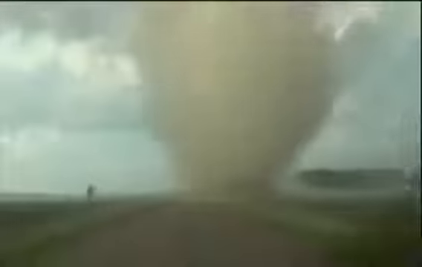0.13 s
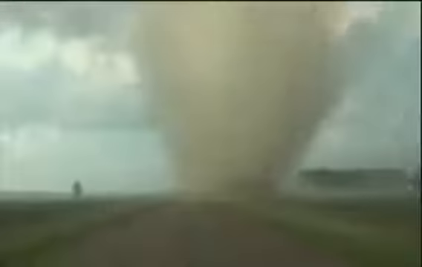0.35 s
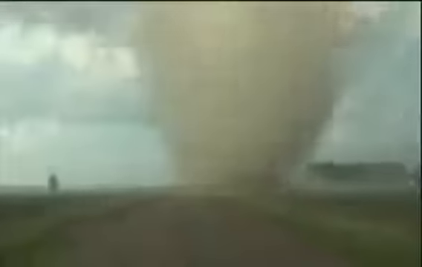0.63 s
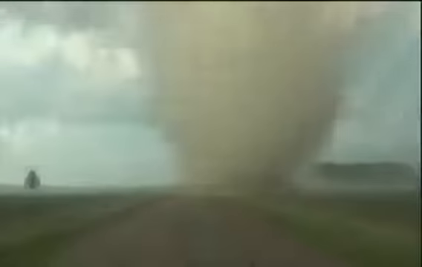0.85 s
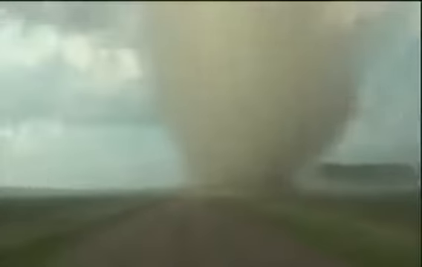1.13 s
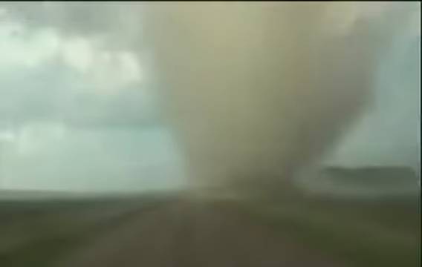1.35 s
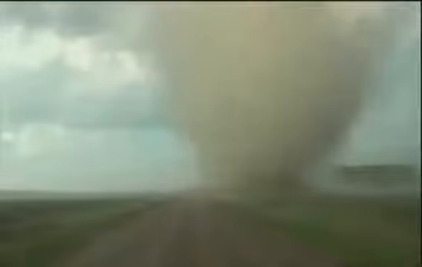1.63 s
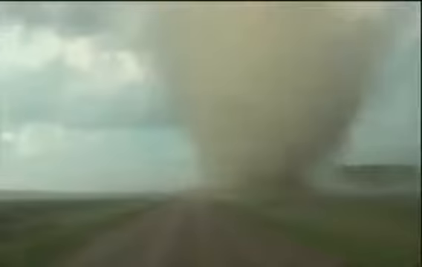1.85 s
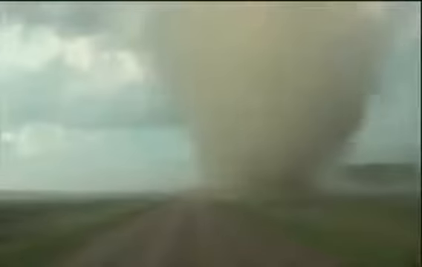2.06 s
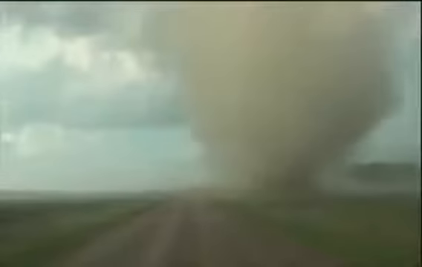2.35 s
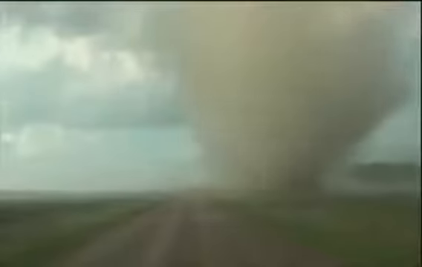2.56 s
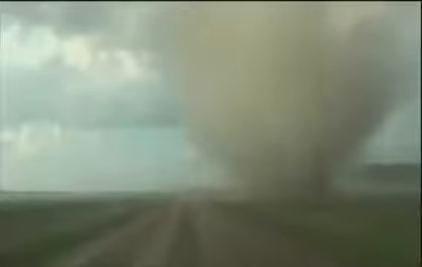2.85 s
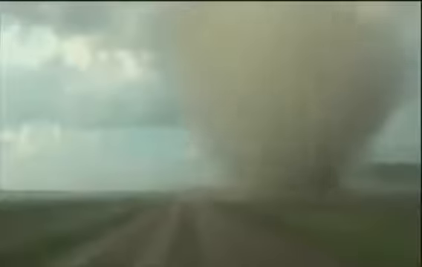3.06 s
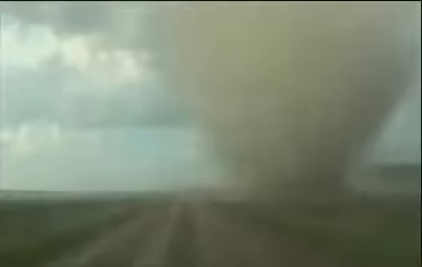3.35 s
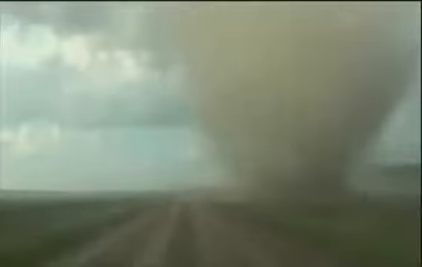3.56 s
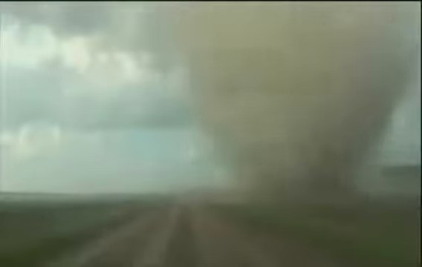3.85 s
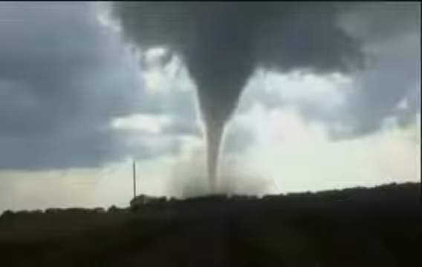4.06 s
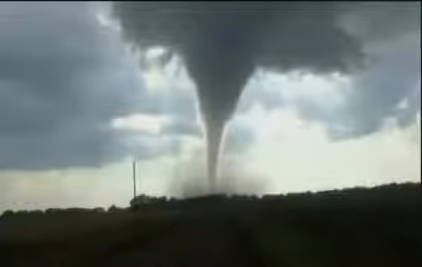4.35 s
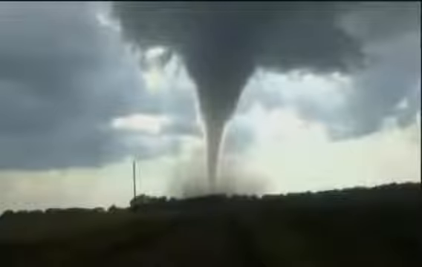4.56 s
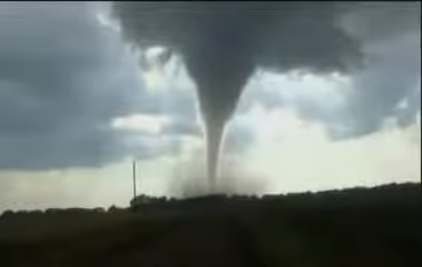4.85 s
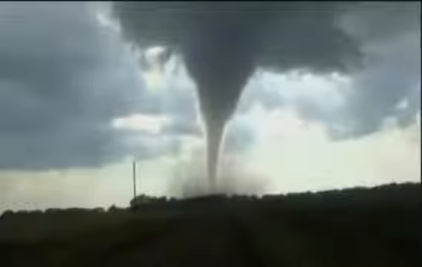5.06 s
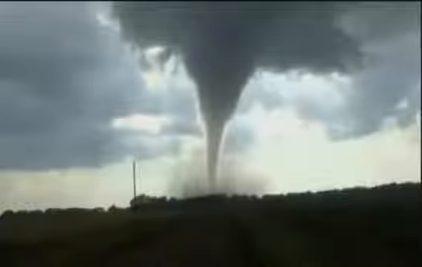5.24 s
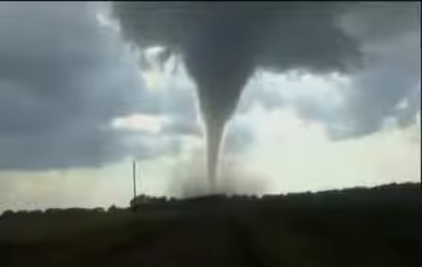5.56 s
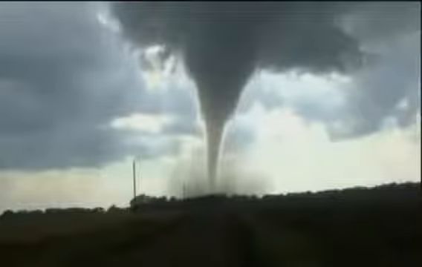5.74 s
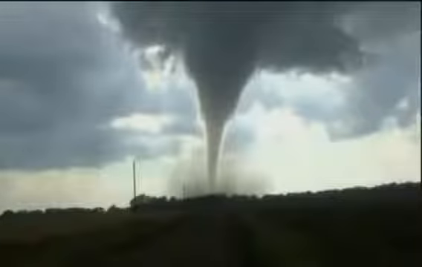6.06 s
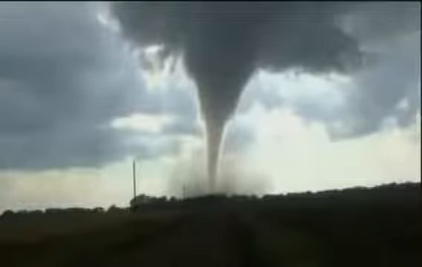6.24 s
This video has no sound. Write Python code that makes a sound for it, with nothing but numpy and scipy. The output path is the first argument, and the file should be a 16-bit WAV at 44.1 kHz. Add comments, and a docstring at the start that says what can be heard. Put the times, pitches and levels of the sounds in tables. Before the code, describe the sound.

A car sits in a tornado's inflow: heavy low wind buffets the close microphone, air rushes over the body and sand hisses. Stones crack hard on metal panels, at first singly, then in a dense cluster from about two seconds, with sprays of dirt. At four seconds it switches abruptly to a far quieter distant storm, a hollow roar over steady hiss with faint high twittering.

```python
"""Car in a tornado's inflow

Gusts buffet the microphone and air rushes over the body: shaped noise whose level follows the wind. Grit hisses
as dense grains; stones crack as decaying crackle and set resonant modes of the car ringing. Clumps of dirt
spray as swelling crackle, and the hardest cracks make the recorder turn its gain down. After four seconds the
storm gives way to a distant funnel: a hollow roar, a soft rumble and a steady hiss, all noise, with a faint
twitter of falling tones. Sines that swell and fade make the body boom throughout."""
import sys
import numpy as np
from scipy import signal
from scipy.fft import rfft, irfft
from scipy.io import wavfile
from scipy.ndimage import uniform_filter1d, minimum_filter1d

SR = 44100
rng = np.random.default_rng(int(sys.argv[2]) if len(sys.argv) > 2 else 0)


def digitize_waveform(pressure):
    """Quantize a signal to 16-bit integers and store it at the path in sys.argv[1].

    Rows of a 2-D input are taken as channels; values are limited to [-1, 1].
    """
    field = np.atleast_2d(pressure).T
    bounded = np.clip(field, -1, 1)
    quanta = np.round(bounded * 32767).astype(np.int16)
    wavfile.write(sys.argv[1], SR, quanta)


N = 282240
TIME = np.arange(N) / SR   # s
BINS_HZ = np.arange(N // 2 + 1) * SR / N
CHANGE_S, CROSSFADE_S = 4.013, 0.044   # middle and length of the passage from near to distant storm
CUTOFF_HZ = 10900   # top of the recorded band

# Strength of the near wind: start_s, buffeting_db (before gusts), rush_db (before lift and flurries)
NEAR_WIND = [(0.0, -16.5, -28), (0.1, -17.5, -28.5), (0.25, -18, -30), (0.7, -18.5, -29.5),
             (0.83, -19.5, -30), (1.02, -16, -26), (1.4, -21.5, -28), (1.6, -21.5, -28), (1.72, -17, -28.5),
             (1.9, -20.5, -30.5), (2.15, -22, -28), (2.33, -21, -30), (2.8, -21.5, -30.5), (3.05, -20, -29),
             (3.33, -22.5, -30.5), (3.6, -18, -29), (3.82, -22.5, -33.5), (4.0, -18, -28)]
# Strength of the wind-borne sand: start_s, level_db (before lift and flurries)
SAND_STRENGTH = [(0.0, -43.5), (0.1, -46), (0.3, -41.5), (0.5, -36.5), (0.85, -41), (0.97, -37),
                 (1.25, -38.5), (1.42, -43.5), (1.7, -42.5), (2.0, -37.5), (2.17, -37.5), (2.28, -37.5),
                 (2.48, -32), (2.64, -39), (3.0, -41), (3.22, -37.5), (3.45, -41), (3.8, -42.5),
                 (4.0, -37.5)]
# Spectrum of the buffeting: frequency_hz, density_db (per Hz, relative)
BUFFET_SPECTRUM = [(12, -7.5), (28, 2.5), (45, 0.5), (60, 5.5), (82, -5), (118, -2.5), (165, -7.5),
                   (230, -11.5), (340, -16), (600, -29.5), (1500, -88)]
# Spectrum of the air rushing over the body: frequency_hz, density_db (per Hz, relative)
RUSH_SPECTRUM = [(100, -14), (175, 5.5), (260, -2), (350, 1), (550, -3), (800, -7.5), (1150, -14.5),
                 (2000, -22), (5000, -57)]


def near_storm():
    """Turbulent pressure fluctuation: gusts lift the buffeting, rushing air and grit share quick flurries."""
    buffet_db, rush_db = in_time(NEAR_WIND)
    sand_db, = in_time(SAND_STRENGTH)
    flurry = drift(19)
    buffet = from_db(buffet_db + gusts()) * shedding(eddies(BUFFET_SPECTRUM, span_s=0.035))
    rush = from_db(rush_db + 0.5 + 1.8 * flurry) * eddies(RUSH_SPECTRUM, span_s=0.024)
    sand = from_db(sand_db + 0.98 + 0.5 * flurry)
    hissing_grit = stereo(grit(sand), grit(sand), side_db=-11.5)
    impacts = stereo(debris(), debris(), side_db=-11.0)
    return buffet + rush + hissing_grit + impacts


# Pitch of the eddies on the microphone: start_s, pitch_hz (only its ratio to the first row acts)
EDDY_PITCH_CURVE = [(0.0, 58.42), (0.7, 62.4), (1.3, 53.99), (2.0, 44.11), (3.0, 43.69), (3.6, 52.5),
                    (4.0, 47.13)]


def shedding(x):
    """Frequency scaling: eddies come faster or slower with the wind and carry the whole spectrum along."""
    pitch_hz, = in_time(EDDY_PITCH_CURVE)
    position = np.cumsum(pitch_hz / pitch_hz[0])
    return np.interp(position, np.arange(N), x, period=N)


# Single gusts on the microphone: centre_s, lift_db (negative lowers the wind)
SINGLE_GUSTS = [(1.39, 5.5), (1.51, 6), (1.88, 5.5), (2.06, 3), (2.99, 2.5), (3.69, 1), (3.93, -1),
                (5.69, 2), (5.972, 11), (6.15, 5), (6.241, 11)]


def gusts(half_s=0.036):
    """Amplitude modulation: each gust briefly raises or lowers the low wind, as a bell curve in dB."""
    return sum(db * np.exp(-0.5 * ((TIME - s) / half_s) ** 2) for s, db in SINGLE_GUSTS)


# Stones on the panels: start_s, level_db, ring_s (60 dB decay), dull_hz (treble falls above), thud_hz,
# thud_db (against the crack)
STONE_HITS = [(0.1185, -4, 0.12, 3080, 715, -15.5), (0.1296, -2, 0.015, 3480, 1300, -12),
              (0.144, -18, 0.04, 4000, 1400, -10), (0.269, -25.5, 0.042, 2500, 480, 5),
              (1.4409, -1, 0.043, 3320, 714, -14.5), (1.566, -26.5, 0.19, 6000, 500, -23),
              (1.611, -33.5, 0.15, 5000, 500, -7), (2.108, -11.5, 0.018, 12000, 600, 4),
              (2.11, -0.5, 0.11, 6840, 1580, -11), (2.118, -10.5, 0.072, 5500, 437, 5.5),
              (2.164, -19, 0.26, 8100, 524, -5.5), (2.218, -26, 0.007, 3000, 1600, 7),
              (2.261, -12.5, 0.035, 6100, 1500, -12), (2.361, -23.5, 0.12, 7000, 500, -21),
              (2.559, -14, 0.034, 8000, 500, -13), (2.6, -17, 0.018, 6500, 500, -17),
              (2.6153, -17, 0.059, 8050, 500, -29), (2.669, -20.5, 0.075, 6040, 520, 0),
              (2.797, -16, 0.057, 5760, 500, -25), (3.301, -14, 0.057, 12000, 510, -2.5),
              (3.396, -14.5, 0.01, 12000, 500, -22), (3.74, -12.5, 0.056, 11000, 496, -15)]
# Clumps of dirt: peak_s, level_db, half_s (half length), dull_hz (treble falls above), thud_hz,
# thud_db (against the spray)
DIRT_CLUMPS = [(0.277, -25, 0.013, 2360, 484, -2), (0.736, -37.5, 0.051, 6000, 368, 8),
               (0.952, -29, 0.0063, 8000, 500, -8), (1.041, -28.5, 0.012, 6000, 620, 4.5),
               (1.836, -29, 0.02, 6760, 436, 1.5), (2.021, -24.5, 0.012, 8000, 513, -4),
               (2.076, -25.5, 0.0087, 8000, 500, -3), (2.324, -25, 0.0068, 9000, 503, -25),
               (2.401, -22.5, 0.0098, 9150, 505, -11), (2.53, -23, 0.017, 7500, 478, -5),
               (2.68, -20, 0.014, 7700, 930, -4.5), (3.221, -29, 0.0051, 9000, 500, -22),
               (3.263, -28, 0.021, 10100, 460, 0), (3.298, -32, 0.016, 7000, 490, 8),
               (3.462, -32.5, 0.0067, 12400, 497, -4), (3.702, -19, 0.015, 5400, 666, -5),
               (3.921, -27.5, 0.015, 7460, 500, -19), (3.979, -24, 0.012, 9700, 925, 2),
               (4.001, -36, 0.0076, 2500, 940, 8)]


def debris(snap=0.91, snap_s=0.00064, bite_s=0.00025, crumble=1.184, lumpy_db=1.4):
    """Impact excitation: stones snap, crumble and leave the body ringing; dirt swells and scatters in lumps."""
    crackle = soften(grains(per_s=22000, spread_db=4.0), 1700, "high", order=2)
    lumps_db = lumpy_db * drift(73)
    age = np.arange(int(SR / 4)) / SR
    middle = age[-1] / 2
    out, hard = np.zeros((2, N))
    for s, db, ring_s, *tone in STONE_HITS:
        uneven = from_db(lumps_db[int(s * SR):][:len(age)])
        fall = from_db(-60 * np.minimum(age / ring_s, 2) ** crumble)
        build_up = 1 - np.exp(-age / bite_s)
        envelope = from_db(db) * build_up * (fall * uneven + snap * np.exp(-age / snap_s))
        crack = contact(envelope, crackle, *tone)
        add(out, s, crack)
        add(hard, s, from_db(db) * crack)   # level counts twice: only hard blows ring the panels much
    for s, db, half_s, *tone in DIRT_CLUMPS:
        swell = np.exp(-0.5 * ((age - middle) / half_s) ** 2)
        envelope = from_db(db + lumps_db[int(s * SR):][:len(age)]) * swell
        add(out, s - middle, contact(envelope, crackle, *tone))
    return soften(out + panel(hard) + 1e-18, 8840, order=2) + clank(age)


def contact(envelope, crackle, dull_hz, thud_hz, thud_db, thud_width=0.28):
    """Contact noise and flexure: a burst of crumbling contacts, with a panel thud as narrow-band noise."""
    size = len(envelope)
    start = int(rng.random() * (N - size))
    narrow = resonate(rng.standard_normal(size), thud_hz, thud_width * thud_hz)
    flex = signal.hilbert(soften(narrow, 2170, order=2))
    thud = rms_one(flex.real / np.sqrt(np.abs(flex) + 1e-9))   # evens out the swings of the noise
    burst = soften(envelope * crackle[start:start + size] + 1e-18, dull_hz, order=2)
    return burst + from_db(thud_db) * envelope * thud


# Ringing modes of the panels: frequency_hz, bandwidth_hz, level_db
PANEL_MODES = [(2046, 60, -2), (3092, 45, 1), (4018, 45, 1), (6020, 40, -5), (6636, 40, -4), (7153, 40, -2),
               (7392, 55, -2), (8245, 35, -2), (8365, 35, -2), (8785, 35, -3), (9517, 45, 4), (9789, 30, 4),
               (10521, 28, 10), (10761, 28, 11)]


def panel(x):
    """Modal resonance: a contact sets the narrow modes of the panels ringing."""
    return sum(from_db(db) * resonate(x, hz, width_hz) for hz, width_hz, db in PANEL_MODES)


# Lower modes of the body: frequency_hz, level_db (before the common clank level and scatter)
BODY_MODES = [(716, -2), (840, -7), (940, -6), (1330, -4), (1540, -1), (1790, -4), (1986, -1), (2422, -4),
              (2750, -5), (3450, -2)]


def clank(age, lowest_t60_s=0.09, level_db=-10.5, rise_s=0.012, uneven_db=2.5, detune=0.028):
    """Modal decay: every stone rings the lower body modes, scattered in pitch; high modes die sooner."""
    out = np.zeros(N)
    build_up = 1 - np.exp(-age / rise_s)
    for s, db, *_ in STONE_HITS:
        for hz, mode_db in BODY_MODES:
            t60_s = lowest_t60_s / np.sqrt(hz / BODY_MODES[0][0])
            start_db = db + level_db + mode_db + uneven_db * rng.standard_normal()
            level = from_db(start_db - 60 * age / t60_s)
            spot_hz = hz * (1 + detune * rng.standard_normal())
            add(out, s, level * build_up * np.sin(2 * np.pi * (spot_hz * age + rng.random())))
    return out


# Spectrum laid over the grit: frequency_hz, gain_db
GRIT_SPECTRUM = [(400, -41), (1000, -6.5), (2300, 5.5), (3500, 1.5), (5500, -2), (8000, -4.5), (10000, -11),
                 (11000, -21)]


def grit(level):
    """Shot noise: dense grains of coarse and fine sand, too light to ring the car, in patchy flurries."""
    coarse = soften(grains(per_s=9000, spread_db=1.0), 4900, order=2) * from_db(1.67 * drift(59))
    fine = soften(grains(per_s=12000, spread_db=1.5), 4050, "high", order=2) * from_db(2.84 * drift(51))
    return level * rms_one(patchy(colour(coarse + fine, GRIT_SPECTRUM), depth_db=2.5, rate=17))


# Gusts that make the body boom: peak_s, level_db (rms at the peak), half_s (half length), pitch_hz
BODY_BOOMS = [(0.09, -18, 0.018, 121), (1.05, -20, 0.012, 246), (1.267, -17, 0.02, 118),
              (4.074, -19.5, 0.0081, 225), (4.47, -35, 0.0064, 266), (5.135, -34, 0.013, 190),
              (5.30, -26, 0.006, 223), (5.385, -26.5, 0.007, 201), (5.525, -23.5, 0.0087, 220),
              (5.70, -36, 0.0093, 258), (5.86, -42, 0.017, 458), (6.09, -31, 0.015, 211),
              (6.267, -33, 0.0067, 410), (6.33, -39, 0.012, 210)]


def booms():
    """Cavity resonance: single gusts swell a hollow tone of the body for a few cycles."""
    out = np.zeros(N)
    age = np.linspace(-0.1, 0.1, int(0.2 * SR))
    for s, db, half_s, hz in BODY_BOOMS:
        swell = from_db(db) * np.exp(-0.5 * (age / half_s) ** 2)
        add(out, s + age[0], swell * np.sqrt(2) * np.sin(2 * np.pi * (hz * age + rng.random())))
    return out


# Strength of the distant wind: start_s, rumble_db (before gusts and bass cut), roar_db (before lift)
FAR_WIND = [(4.03, -32, -36), (4.16, -31.5, -36), (4.24, -46, -44.5), (4.38, -43, -43.5), (4.55, -54, -44),
            (4.71, -49, -45.5), (4.78, -39, -43), (5.03, -51, -44.5), (5.14, -45, -42.5), (5.33, -49, -40),
            (5.46, -47, -40), (5.55, -34, -35.5), (5.63, -43, -48.5), (5.7, -43, -40), (5.97, -50, -41.5),
            (6.09, -44.5, -41), (6.24, -52, -39.5), (6.4, -43, -43.5)]
# Spectrum of the distant rumble: frequency_hz, density_db (per Hz, relative)
FAR_RUMBLE_SPECTRUM = [(20, -20), (38, -24), (55, -13), (75, 0), (100, -1), (125, -2.5), (200, -17),
                       (500, -61)]
# Spectrum of the hollow roar: frequency_hz, density_db (per Hz, relative)
FAR_ROAR_SPECTRUM = [(90, -33), (135, -8.5), (175, -3.5), (215, -0.5), (250, -6.5), (295, -5.5),
                     (360, -15.5), (800, -65)]
# Spectrum of the distant rushing air: frequency_hz, density_db (per Hz, relative)
FAR_RUSH_SPECTRUM = [(250, -7), (360, -6.5), (460, 4), (600, -3.5), (850, -6.5), (1150, -20.5), (3000, -54)]
# Spectrum of the steady hiss: frequency_hz, density_db (per Hz, relative)
FAR_HISS_SPECTRUM = [(590, 2.5), (1000, -1), (1450, 2.5), (1590, 1), (2810, 1), (3910, -2.5), (4980, -1),
                     (5350, -10), (5700, -11), (6200, -8), (7100, -15), (7850, -11.5), (8700, -19),
                     (9700, -13), (10800, -19.5), (11200, -52)]


def far_storm(rush_db=-46.5, rush_follows=0.5, hiss_db=-51):
    """Broadband flow noise: hollow roar, soft rumble and air that follows the roar, over an even hiss."""
    rumble_db, roar_db = in_time(FAR_WIND)
    swing_db = roar_db - roar_db[TIME > CHANGE_S].mean()
    rumble = from_db(rumble_db + gusts()) * eddies(FAR_RUMBLE_SPECTRUM, span_s=0.085)
    roar = from_db(roar_db + 3.5) * eddies(FAR_ROAR_SPECTRUM, span_s=0.091)
    rush = from_db(rush_db + rush_follows * swing_db) * eddies(FAR_RUSH_SPECTRUM, span_s=0.67)
    hiss_mid = patchy(noise(FAR_HISS_SPECTRUM), depth_db=0.94, rate=13)
    hiss = from_db(hiss_db) * stereo(hiss_mid, noise(FAR_HISS_SPECTRUM), side_db=-9.0)
    return soften(rumble, 32, "high", order=2) + roar + rush + hiss + twitter()


# Phrases of the twitter: crest_s, top_hz, level_db (before scatter)
TWITTER_PHRASES = [(4.105, 5620, -57), (4.483, 5620, -57), (4.85, 5430, -57.5), (5.215, 5330, -56.5),
                   (5.614, 5380, -56.5), (5.998, 5350, -57), (6.39, 5300, -59)]
# Chirps of one phrase: after_crest_s, below_top_hz, level_db (against the phrase)
PHRASE_CHIRPS = [(-0.1, 900, 0), (-0.055, 348, -2), (-0.036, 78, 1), (-0.025, 680, -5), (-0.012, 400, 1),
                 (0.0, 4, -2), (0.018, 300, 0), (0.037, 60, -1), (0.046, 520, 2), (0.085, 480, -1),
                 (0.118, 650, -3), (0.19, 1050, -2)]


def twitter(chirp_s=0.024, fall_hz_per_s=18000, scatter_hz=45, late_s=0.0013, uneven_db=4.0):
    """Frequency modulation: arches of faint falling chirps, never quite alike, with softer chirps strewn among."""
    out = np.zeros(N)
    age = np.linspace(-0.5, 0.5, int(chirp_s * SR)) * chirp_s
    notes = [(crest_s + after_s, top_hz - below_hz, phrase_db + db)
             for crest_s, top_hz, phrase_db in TWITTER_PHRASES
             for after_s, below_hz, db in PHRASE_CHIRPS]
    notes += [(s, rng.uniform(4259.9, 5150), -66)   # the soft chirps: s, Hz, dB
              for s in rng.uniform(CHANGE_S, N / SR, size=90)]
    chances = rng.standard_normal((len(notes), 3))
    for (s, hz, db), (late, detune, loud) in zip(notes, chances):
        sweep_hz = hz + scatter_hz * detune - fall_hz_per_s * age
        chirp = np.hanning(len(age)) * np.sin(2 * np.pi * np.cumsum(sweep_hz) / SR)
        add(out, s + age[0] + late_s * late, from_db(db + uneven_db * loud) * chirp)
    return out


def from_db(db):
    """Logarithmic level: decibels to amplitude gain."""
    return 10 ** (np.asarray(db) / 20)


def rms_one(x):
    """Effective value: scale to unit rms."""
    return x / np.sqrt(np.mean(x ** 2) + 1e-20)


def in_time(rows):
    """Linear interpolation: each column of a curve table at every sample."""
    s, *columns = np.transpose(rows)
    return [np.interp(TIME, s, c) for c in columns]


def colour(x, spectrum):
    """Spectral shaping: weight a sound by a curve drawn over log frequency."""
    hz, db = np.transpose(spectrum)
    gain_db = np.interp(np.log(np.maximum(BINS_HZ, 1)), np.log(hz), db)
    return irfft(rfft(x) * from_db(gain_db), N)


def noise(spectrum):
    """Stationary random noise of a given spectrum, rms 1."""
    return rms_one(colour(rng.standard_normal(N), spectrum))


def drift(rate):
    """Low-pass random process: slow chance of rms 1, weakening above the rate in Hz."""
    return rms_one(irfft(rfft(rng.standard_normal(N)) / (1 + (BINS_HZ / rate) ** 2), N))


def eddies(spectrum, span_s):
    """Turbulence of steady short-term power: noise divided by its own smoothed strength."""
    x = noise(spectrum)
    size = max(int(span_s * SR), 2)
    power = uniform_filter1d(uniform_filter1d(x ** 2, size), size)
    return x / np.sqrt(power + 1e-9)


def grains(per_s, spread_db):
    """Poisson impulses: random tiny impacts of uneven size and either sign, rms 1."""
    sizes = from_db(spread_db * np.minimum(rng.exponential(1, N), 4)) * rng.choice([-1, 1], N)
    return rms_one(sizes * (rng.random(N) < per_s / SR))


def patchy(x, depth_db, rate, count=14):
    """Independent band modulation: each band of the treble swells and sinks on its own."""
    spectrum = rfft(x)
    centres_hz = np.geomspace(1000, CUTOFF_HZ, count)
    out = np.zeros(N)
    for band in np.eye(count):
        part = irfft(spectrum * np.interp(BINS_HZ, centres_hz, band), N)
        out += part * from_db(depth_db * drift(rate))
    return out


def soften(x, hz, kind="low", order=1):
    """Butterworth filtering: gentle low- or high-pass."""
    sos = signal.butter(order, min(hz, 0.45 * SR), kind, fs=SR, output="sos")
    return signal.sosfilt(sos, x)


def resonate(x, hz, width_hz):
    """Damped oscillator: one resonance with gain of about 1 on top."""
    r = np.exp(-np.pi * width_hz / SR)
    feedback = [1, -2 * r * np.cos(2 * np.pi * hz / SR), r * r]
    return signal.lfilter(np.array([1, 0, -1]) * (1 - r * r) / 2, feedback, x + 1e-18)


def add(out, s, sound):
    """Superposition: mix a short sound in at time s."""
    start = max(int(s * SR), 0)
    out[start:start + len(sound)] += sound[:max(N - start, 0)]


# Width of the sound: frequency_hz, side_db (gain on the side signal, before each layer's own)
STEREO_WIDTH = [(300, -70), (1100, -48), (2000, -60.5), (3500, -8.5), (6300, 6), (11000, 8)]


def stereo(mid, side, side_db):
    """Mid-side coherence: the bass is all but the same on both sides, the treble spreads."""
    return mid + from_db(side_db) * colour(side, STEREO_WIDTH) * np.array([[1], [-1]])


def scene():
    """Crossfade: the near storm quickly gives way to the distant one; booms sound throughout."""
    far = np.clip((TIME - CHANGE_S) / CROSSFADE_S + 0.5, 0, 1)
    return (1 - far) * near_storm() + far * far_storm() + booms()


def gain_control(x, threshold_db=-27, squeeze=0.37, sense_s=0.0018,
                 attack_s=0.0011, hold_s=0.039, release_db_per_s=55):
    """Dynamic compression: a snap slips through, treble pulls all down; after a hold the wind swells back."""
    treble = soften(x.mean(axis=0), 1150, "high", order=2)
    power = np.abs(uniform_filter1d(treble ** 2, max(int(sense_s * SR), 2)))
    level_db = 10 * np.log10(power + 1e-12)
    cut_db = squeeze * np.maximum(level_db - threshold_db, 0)   # squeeze: share of the excess taken away
    half = max(int(hold_s * SR / 2), 1)
    held_db = -minimum_filter1d(-cut_db, 2 * half + 1, origin=half)   # largest cut of the recent past
    recovery_db = release_db_per_s * TIME
    gain_db = recovery_db - np.maximum.accumulate(held_db + recovery_db)
    return x * from_db(soften(gain_db, 1 / (2 * np.pi * attack_s)))


def record(dry, ceiling=0.54):
    """Saturation and band limiting: gain ducks after hard cracks, peaks are flattened, the top is cut."""
    x = gain_control(dry)
    flattened = x / (1 + (x / ceiling) ** 6) ** (1 / 6)
    top_cut = signal.ellip(10, 0.1, 80, CUTOFF_HZ, fs=SR, output="sos")
    return signal.sosfilt(top_cut, flattened)


dry = scene()
out = record(dry)
digitize_waveform(out)
```